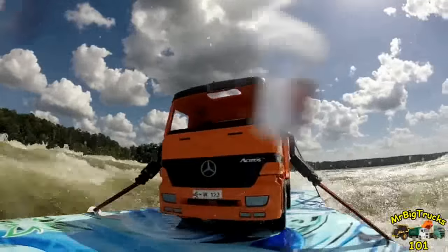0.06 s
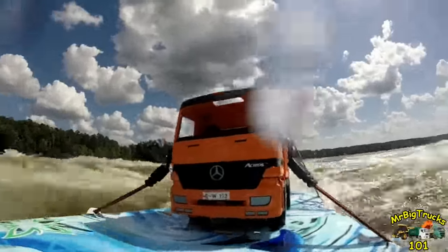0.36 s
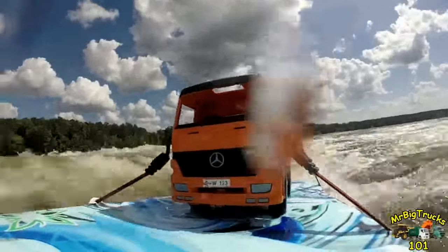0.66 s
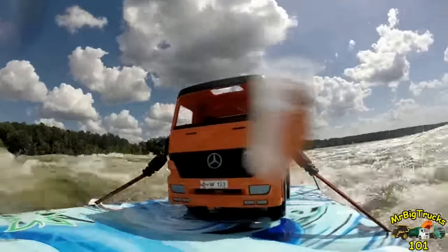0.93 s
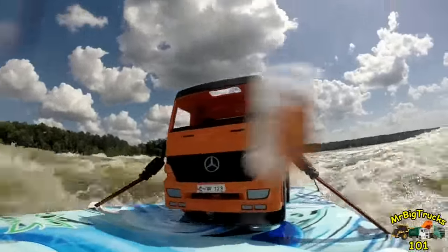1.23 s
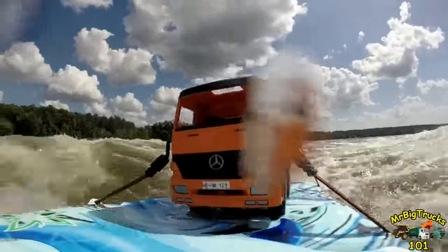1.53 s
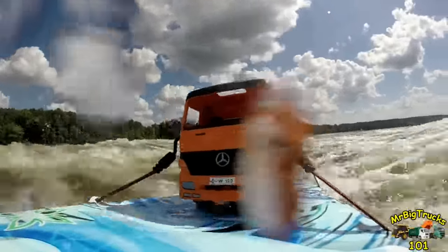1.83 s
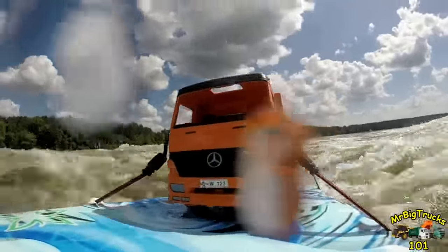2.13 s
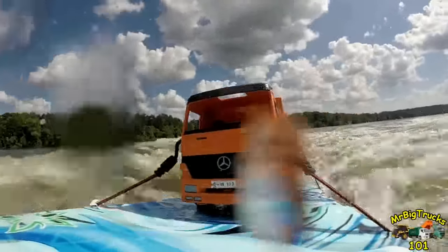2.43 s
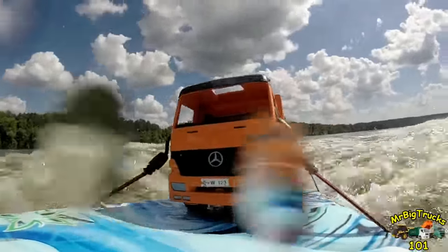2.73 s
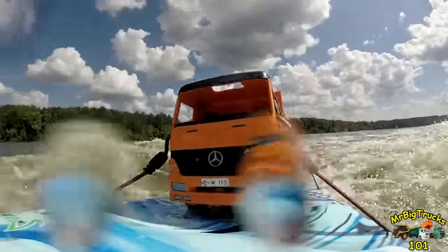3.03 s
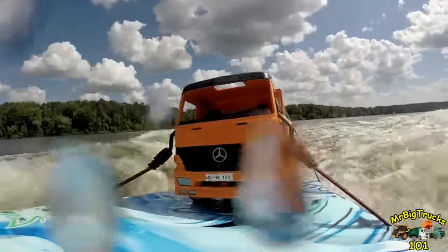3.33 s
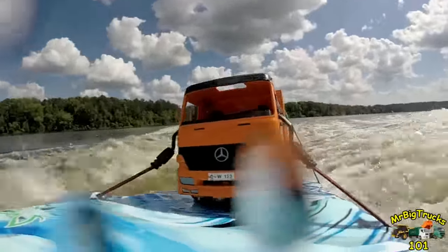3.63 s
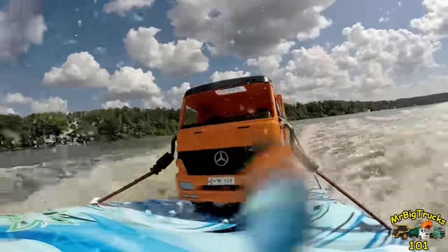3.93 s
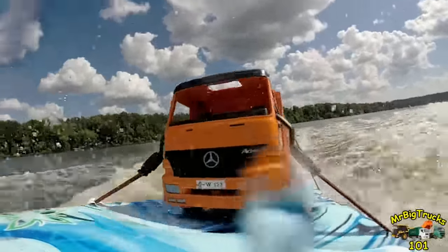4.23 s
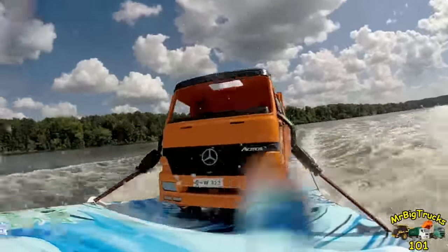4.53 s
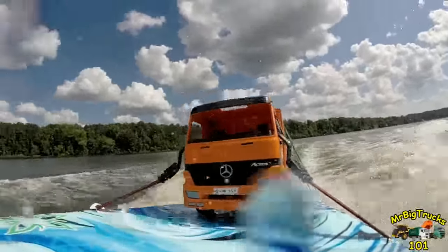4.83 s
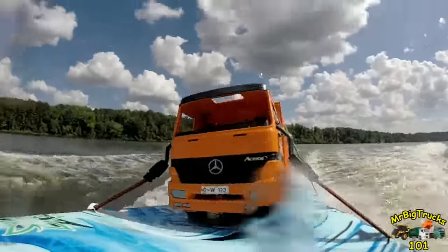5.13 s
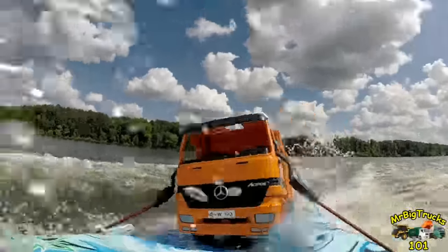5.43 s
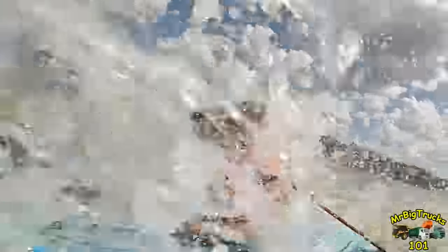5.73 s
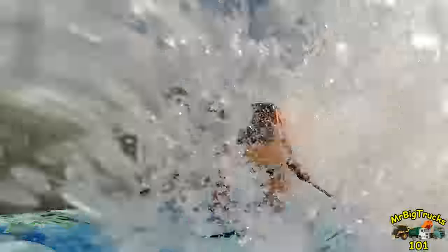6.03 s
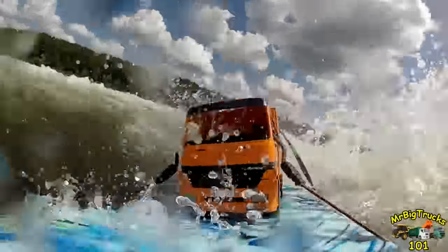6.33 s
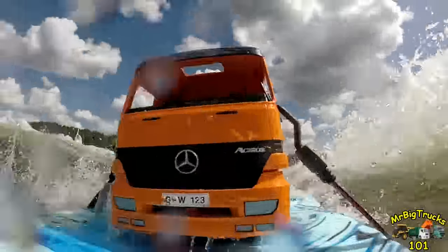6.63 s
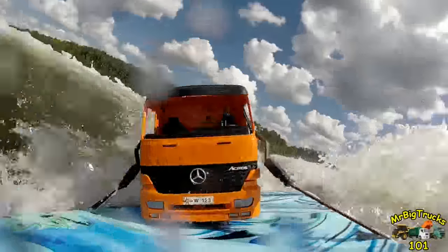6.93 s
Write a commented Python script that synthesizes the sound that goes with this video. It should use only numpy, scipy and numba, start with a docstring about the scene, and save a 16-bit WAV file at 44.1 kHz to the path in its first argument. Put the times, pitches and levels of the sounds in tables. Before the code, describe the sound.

Gusty wind rumbles and flutters throughout on a microphone inside a waterproof case, on a float towed through a boat's wake. Churning water rushes along with it, muffled and hollow, surging at each crest, while the float lands on the chop with dull, low thumps. From the start to 5 seconds, short splashes and sharp slaps hit the case irregularly, strongest near 0.1, 1.2, 1.9, 3.4, 3.7 and 4.0 to 5.0 seconds, mixed with small plops and ticking droplets. From about 5.2 to 5.6 seconds a wave drenches the case: loud, close, crackling sheets of water, rapid slaps and gurgling bubbles that drain into fizz. After a brief dip, another slap and wash arrive around 5.8 seconds. From 6 seconds fine spray sizzles thinly over hollower rushing water and renewed gusts, with final thumps, plops and slaps near 6.8 seconds.

```python
"""In a boat's wake, on a towed float that carries a camera in a waterproof case.
Wind buffets the case and the float thumps on the chop; each crest churns up water and spray,
heard through the case's hollow resonances. Splashes, slaps and fine spatter hit it, air pockets
plop beside it, and a little after five seconds a wave drenches it in sheets."""
import sys
import numpy as np
from scipy import signal
from scipy.fft import rfft, irfft, next_fast_len
from scipy.io import wavfile
from scipy.ndimage import uniform_filter1d
from numba import njit

SR = 44100
rng = np.random.default_rng(int(sys.argv[2]) if len(sys.argv) > 2 else 0)


def wav_record(signal):
    """Record a signal, one row per channel, as 16-bit PCM in the file named by sys.argv[1]."""
    frames = np.transpose(np.atleast_2d(signal))
    bounded = np.clip(frames, -1, 1)
    # unit amplitude maps onto the largest positive 16-bit level
    quanta = np.round(bounded * 32767).astype(np.int16)
    wavfile.write(sys.argv[1], SR, quanta)


N = 307818
TIME = np.arange(N) / SR


def undb(db):
    """Decibels to gain."""
    return 10 ** (np.asarray(db) / 20)


def unit(x):
    """Scale to rms 1."""
    return x / np.sqrt(np.mean(x ** 2))


def curves(table):
    """One automation curve for each column after the time."""
    times, *columns = np.transpose(table)
    return [np.interp(TIME, times, column) for column in columns]


def add(out, start, x):
    """Mix x into out from start seconds on."""
    i = int(start * SR)
    out[i:i + len(x)] += x[:N - i]


def colour(x, points):
    """Minimum-phase EQ drawn through (frequency [Hz], gain [dB]) points."""
    size = next_fast_len(len(x) // 2 + 2 ** 10) * 2
    hz, db = np.transpose(points)
    freq = np.maximum(np.fft.rfftfreq(size, 1 / SR), 1)
    gain = undb(np.interp(np.log(freq), np.log(hz), db))
    cepstrum = irfft(np.log(gain))
    cepstrum[1:size // 2] *= 2
    cepstrum[size // 2 + 1:] = 0
    return irfft(rfft(x, size) * np.exp(rfft(cepstrum)))[:len(x)]


def band(x, low_hz, high_hz):
    """Steep band-pass."""
    return signal.sosfilt(signal.butter(4, [low_hz, high_hz], btype="band", fs=SR, output="sos"), x)


@njit
def resonate(x, hz, width):
    """Band-pass with a moving centre, gain 1 there."""
    out, band_state, low_state = np.empty(len(x)), 0., 0.
    for i in range(len(x)):
        tuning, damping = np.tan(np.pi * hz[i] / SR), width / hz[i]
        passed = (band_state + tuning * (x[i] + 1e-18 - low_state)) / (1 + tuning * (tuning + damping))
        band_state = 2 * passed - band_state
        low_state += 2 * tuning * passed
        out[i] = damping * passed
    return out


def wander(rate):
    """Smooth random modulation with rate new values a second; rms 1."""
    hold = int(SR / rate)
    steps = np.repeat(rng.standard_normal(N // hold + 1), hold)
    return unit(uniform_filter1d(uniform_filter1d(steps, hold), hold)[:N])


def steady(x, span):
    """Even out swells slower than span seconds; rms near 1."""
    window = int(span * SR)
    power = uniform_filter1d(uniform_filter1d(x ** 2, window), window)
    return x / np.sqrt(power + 1e-12)


def swells(times, halves, levels_db):
    """Summed power of rounded swells that peak at the given times."""
    shape, fall_ratio = 1.94, 0.91  # 1 = pointed, 2 = bell; fall time over rise time
    power = np.zeros(N)
    for when, half, db in zip(times, halves, levels_db):
        near = slice(*np.searchsorted(TIME, [when - 6 * half, when + 6 * half]))
        away = (TIME[near] - when) / half
        power[near] += undb(db) ** 2 * np.exp(-np.maximum(-away, away / fall_ratio) ** shape)
    return power


def burst(source, start, length, rise, fall):
    """A stretch of source that swells fast, sags while the water lands and dies away; times in s."""
    i = int(start * SR)
    piece = np.take(source, np.arange(i, i + 2 ** 13), mode="wrap")
    t = np.arange(len(piece)) / SR
    attack = 1 - np.exp(-t / rise)
    decay = np.exp(-.6 * t / length - np.maximum(t - length, 0) / fall)
    return piece * attack * decay


def sized(x, length, db):
    """Give a burst the energy of length seconds at db."""
    return x * undb(db) * np.sqrt(length * SR / np.sum(x ** 2))


def patter(rate, spread_db):
    """Drop impacts at random moments, mostly small and a few large; rms 1."""
    sizes = undb(spread_db * np.minimum(rng.exponential(size=N), 5))
    lands = rng.random(N) < rate / SR
    return unit(lands * sizes * rng.standard_normal(N))


def pings(strikes, hz, cycles):
    """Each strike starts a sine that dies away over a few cycles."""
    pole = np.exp((2j * np.pi - 1 / cycles) * hz / SR)
    return signal.lfilter([0, pole.imag], [1, -2 * pole.real, abs(pole) ** 2], strikes + 1e-18)


def bubbles(rate, spread_db, cycles, size=N):
    """Bubbles of all sizes burst at random moments, each ringing briefly; flat spectrum, rms 1."""
    out = np.zeros(size)
    pitches = np.geomspace(300, 10800, 44)
    for hz in pitches:
        when, chance, sign = rng.random((int(rate * size / SR / len(pitches)), 3)).T
        strength = undb(spread_db * np.minimum(-np.log1p(-chance), 3.5))
        strikes = np.bincount((when * size).astype(int), np.sign(sign - .5) * strength, size)
        out += hz * pings(strikes, hz, cycles)
    return unit(out)


# the muffling of the case wall: (frequency [Hz], gain [dB])
CASE_EQ = [(150, 6.5), (400, -6), (590, 2), (740, 0), (900, 0), (1120, -7), (1350, -24), (1750, -16),
           (2500, -29), (3300, -37), (4400, -32), (6300, -43), (7200, -52.5), (9500, -50.5)]


def through_case(x):
    """The case lets the lows through and dulls the top."""
    return colour(x, CASE_EQ)


# sharp resonances of the case: (frequency [Hz], width [Hz], boost [dB])
CASE_RESONANCES = [(538, 98, 3.5), (888, 75, 2), (1240, 170, 4.5), (2542, 340, 7.5), (4360, 250, 6),
                   (6190, 150, 6.5), (8020, 400, 14), (8830, 340, 14)]


def case_ring(x, drift):
    """The case rings; water running over it detunes the resonances, 1.3 % per unit of drift."""
    tuning = np.ones(len(x)) + 0.013 * drift
    out = x
    for hz, width, db in CASE_RESONANCES:
        out = out + (undb(db) - 1) * resonate(x, hz * tuning, float(width))
    return out


# the bed of moving water and air: (time [s], rush [dB], buffet [dB], mist [dB])
FLOW = [(0, -30, -26, -63), (.13, -63, -37, -53), (.19, -42, -31, -64.5), (.6, -34.5, -23, -60.5),
        (1.46, -36, -27, -58.5), (2.06, -35.5, -25, -56), (2.64, -31, -23.5, -51), (2.93, -40, -28, -57.5),
        (3.62, -38.5, -27, -57.5), (4.42, -39.5, -27, -57.5), (4.77, -35.5, -28.5, -60),
        (5.16, -45, -34, -59), (5.22, -23, -18, -54), (5.56, -39, -30, -61), (5.65, -42, -43, -59),
        (5.96, -46.5, -31, -62), (6.05, -35, -23, -54.5), (6.98, -33, -21.5, -52)]


def flow():
    """Power of the rush, buffet and mist streaming past the float, swelling and dipping."""
    return [undb(db) ** 2 for db in curves(FLOW)]


# crests of the wake: (time [s], half length [s], rush [dB], buffet [dB], extra spray [dB])
CRESTS = [(0.048, 0.041, -26, -18.5, 4.5), (0.112, 0.017, -28, -16.5, 3.5), (0.473, 0.063, -33, -34, -1.5),
          (0.832, 0.064, -25.5, -20, 0), (1.189, 0.061, -27, -19, -0.5), (1.296, 0.023, -24, -19, 1),
          (1.57, 0.033, -29.5, -18, -2.5), (1.711, 0.062, -26.5, -18.5, -7.5),
          (1.887, 0.062, -27, -26.5, 1.5), (2.183, 0.042, -33.5, -23, 0), (2.346, 0.023, -30.5, -24.5, 5),
          (2.555, 0.033, -23, -19.5, -0.5), (2.675, 0.029, -27, -22, 0.5), (2.814, 0.025, -22, -23, -0.5),
          (3.084, 0.076, -41, -27, 4), (3.143, 0.026, -25.5, -29, 2), (3.236, 0.044, -34, -23.5, 0),
          (3.392, 0.023, -23.5, -23, -2), (3.501, 0.069, -31.5, -26.5, 2), (3.774, 0.064, -28.5, -19.5, 1),
          (3.842, 0.036, -26, -22.5, 1), (4.087, 0.046, -27.5, -16, 6), (4.185, 0.032, -32.5, -31, 5.5),
          (4.279, 0.035, -23.5, -16.5, 1), (4.403, 0.029, -33.5, -23.5, 2), (4.497, 0.033, -28.5, -17, 5),
          (4.662, 0.019, -31.5, -19, 6.5), (4.84, 0.018, -35, -21, 8.5), (4.931, 0.034, -33.5, -19.5, 8),
          (5.033, 0.042, -36.5, -21.5, 8.5), (5.476, 0.039, -35, -17, 9), (5.607, 0.0055, -32, -9, 0),
          (5.774, 0.068, -32.5, -25.5, -2), (5.859, 0.043, -35, -21, 3), (6.12, 0.027, -35, -30, -12),
          (6.19, 0.057, -25, -20, -2), (6.509, 0.048, -22.5, -29, -5.5), (6.78, 0.045, -25.5, -15, -4),
          (6.827, 0.016, -20, -14, -6), (6.948, 0.03, -33.5, -29, 9)]


def crests():
    """Power of rush, buffet and spray, swelling as the float runs over each crest."""
    when, half, rush_db, buffet_db, spray_db = np.transpose(CRESTS)
    return [swells(when, half, db) for db in (rush_db, buffet_db, rush_db + spray_db)]


# headwind on the case: (time [s], rumble level [dB])
HEADWIND = [(0, -14.5), (.2, -23), (.48, -22.5), (.75, -16.5), (.97, -20.5), (1.2, -11), (1.62, -27),
            (2.1, -26.5), (3.0, -18), (3.6, -21.5), (4.3, -16.5), (4.6, -14.5), (5.12, -25), (5.48, -28),
            (5.65, -31), (5.78, -17.5), (5.98, -22), (6.45, -12.5), (6.98, -21)]
# gusts on top of it: (time [s], half length [s], rumble level [dB])
GUSTS = [(0.073, 0.059, -12.5), (0.88, 0.028, -9), (1.342, 0.024, -12), (1.768, 0.044, -8.5),
         (1.978, 0.022, -10), (2.316, 0.19, -11.5), (2.582, 0.044, -11.5), (2.729, 0.014, -7),
         (2.832, 0.017, -12.5), (6.26, 0.045, -14), (6.773, 0.032, -10)]
# sub weight of large, slow eddies: (frequency [Hz], gain [dB])
RUMBLE_EQ = [(8, -46), (18, 3), (27, 6.5), (42, -2), (65, -12), (110, -26), (300, -80.5)]
# low flutter of small, quick eddies: (frequency [Hz], gain [dB])
BUFFET_EQ = [(40, -4.5), (75, 0), (140, -0.5), (200, -6), (280, -11), (420, -20), (900, -65), (3000, -78.5)]


def wind():
    """Eddies press on the case in lumps; small ones come in ragged puffs, torn off the large ones."""
    headwind_db, = curves(HEADWIND)
    rumble_gain = np.sqrt(undb(headwind_db) ** 2 + swells(*np.transpose(GUSTS)))
    _, flow_buffet, _ = flow()
    _, crest_buffet, _ = crests()
    rumble = steady(colour(rng.standard_normal(N), RUMBLE_EQ), span=0.14)
    rumble = np.interp(TIME - 0.0012 * rumble, TIME, rumble)  # strong eddies lean into steep fronts
    shedding = np.sqrt(1 + rumble ** 2)
    puffs = rng.standard_normal(N) * shedding * undb(2.6 * wander(70))
    buffet = steady(colour(puffs, BUFFET_EQ), span=0.07)
    return rumble * rumble_gain + buffet * np.sqrt(flow_buffet + crest_buffet)


# bite of the rush, which turns hollow once the case is soaked: (time [s], gain at 1150 Hz [dB])
RUSH_EDGE = [(0, 1.5), (1.2, 6), (3.2, 9), (5, 3), (6.1, -8.5), (6.6, -5.5), (6.95, 11)]


def wake():
    """Countless bursting bubbles ring the case; froth, mist and droplets flicker above them."""
    churn = 1.52 * rng.standard_normal(N) + bubbles(rate=2800, spread_db=4, cycles=0.77)
    churn *= undb(2.0 * wander(55))
    inside = case_ring(through_case(churn), drift=wander(6))
    edge_db, = curves(RUSH_EDGE)
    edge = (undb(edge_db) - 1) * signal.lfilter(*signal.iirpeak(1150, 2.5, fs=SR), inside)
    rush = steady(band(inside + edge, 308, 1870) * undb(2.6 * wander(90)), span=0.052)
    froth = steady(band(inside, 1452, 3000) * undb(2.2 * wander(57)), span=0.068)
    coarse_mist = band(inside, 2970, 5660) * undb(2.1 * wander(35))
    fine_mist = band(inside, 5500, 9440) * undb(4.7 * wander(35))
    mist = steady((coarse_mist + fine_mist) * undb(1.7 * wander(56)), span=0.091)
    droplets = unit(band(through_case(patter(rate=100, spread_db=2.0)), 1900, 9000))
    # each crest lifts rush, froth and mist above the bed
    flow_rush, _, flow_mist = flow()
    crest_rush, _, spray = crests()
    flow_froth = undb(-22.5) ** 2 * flow_rush + undb(5) ** 2 * flow_mist
    rush_gain = np.sqrt(flow_rush + crest_rush)
    froth_gain = np.sqrt(flow_froth + undb(-13.5) ** 2 * spray)
    mist_gain = np.sqrt(flow_mist + undb(-28) ** 2 * spray)
    return rush * rush_gain + froth * froth_gain + (mist + undb(-14) * droplets) * mist_gain


# fine rain on the wet microphone port after the wave: (time [s], level [dB])
DRIZZLE = [(5.6, -75), (5.66, -62), (5.82, -63), (5.92, -66), (6.02, -52.5), (6.3, -58.5), (6.49, -48),
           (6.64, -53), (6.84, -60), (6.93, -75), (6.98, -61)]
# its thin, bright tone: (frequency [Hz], gain [dB])
DRIZZLE_EQ = [(1500, -15.5), (2800, -4), (4700, 3.5), (6500, -4), (9800, -6.5)]


def drizzle():
    """Spray thrown up by the wave comes down as a patchy sizzle of droplets."""
    level_db, = curves(DRIZZLE)
    sizzle = unit(colour(patter(rate=1500, spread_db=0), DRIZZLE_EQ))
    return sizzle * undb(level_db + 2.2 * wander(45))


# handfuls of droplets flicked onto the case: (time [s], length [s], level [dB])
SPATTERS = [(.04, .018, -47), (.084, .01, -44), (0.102, .008, -51), (0.45, .01, -50), (0.829, 0.016, -41.5),
            (0.914, .016, -47), (1.308, 0.018, -43.5), (1.592, 0.031, -50), (1.968, 0.014, -49),
            (2.042, 0.013, -44.5), (2.068, 0.0087, -53.5), (2.212, .01, -44), (2.257, 0.02, -48),
            (2.817, .012, -44), (2.96, .008, -48), (2.983, .008, -43.5), (3.456, .014, -41.5),
            (3.487, 0.0048, -47), (3.52, 0.0068, -56), (3.554, .008, -47), (3.73, 0.0098, -46),
            (3.978, .008, -52), (4.06, 0.025, -39), (4.181, 0.015, -41), (4.247, 0.0086, -50),
            (4.518, 0.0097, -42), (4.552, .008, -55), (4.582, .008, -51)]
# their ticking tone: (frequency [Hz], gain [dB])
SPATTER_EQ = [(700, -19), (2700, 5.5), (3400, -4.5), (4600, 3.5), (5400, -7), (6300, -2.5), (7200, -19),
              (8500, -9.5), (9800, -18.5)]


def spatters():
    """Fine droplets land in short ticking clusters, each tinted a little differently."""
    out = np.zeros(N)
    drops = steady(bubbles(rate=2600, spread_db=2.5, cycles=9.2, size=2 * SR), span=0.012)
    shifts = np.exp(0.032 * rng.standard_normal(len(SPATTERS)))
    for (start, length, db), shift in zip(SPATTERS, shifts):
        tint = [(hz * shift, gain_db) for hz, gain_db in SPATTER_EQ]
        cluster = burst(drops, start, length, rise=0.00084, fall=.003)
        add(out, start, sized(colour(cluster, tint), length, db))
    return out


# air pockets closing beside the case: (time [s], peak [dB], starting pitch [Hz], decay [cycles])
PLOPS = [(0.4428, -11, 836, 1.7), (.7862, -7.5, 836, 2.6), (1.1917, -12, 930, 3), (1.523, -15, 880, 3.3),
         (1.9597, -10, 960, 2.5), (2.2375, -14, 810, 1.6), (2.6301, -13, 980, 3), (3.7233, -10, 880, 1.9),
         (4.032, -15.5, 900, 2.5), (4.5393, -10.5, 980, 1.9), (4.7014, -19, 1125, 2),
         (6.826, -15, 900, 2.2), (6.839, -10.5, 942, 5)]


def plops():
    """A closing air pocket swells within a cycle, then rings briefly, rising in pitch as it surfaces."""
    out = np.zeros(N)
    t = np.arange(2 ** 11) / SR
    rise_cycles, glide = 0.31, 5.6
    for start, db, hz, decay_cycles in PLOPS:
        turns = hz * t * (1 + glide * t)
        envelope = (1 - np.exp(-turns / rise_cycles)) * np.exp(-turns / decay_cycles)
        tone = -np.sin(2 * np.pi * turns) * envelope
        add(out, start, undb(db) * tone / np.max(np.abs(tone)))
    return out


# low hits of the float smacking down on the chop: (time [s], peak [dB], pitch [Hz])
THUMPS = [(.122, -4.5, 71), (0.836, -4.5, 70), (1.188, -6, 85.5), (1.697, -14, 95), (1.729, -17, 69),
          (1.856, -4.5, 100), (1.957, -10.5, 65), (1.976, -12, 101), (2.192, -9, 110), (2.372, -7.5, 101),
          (2.586, -4.5, 99), (2.703, -7, 90), (2.829, -6.5, 69), (3.39, -9.5, 111), (3.738, -13, 101),
          (4.179, -5, 65), (4.302, -6.5, 75), (4.411, -5, 85), (4.88, -6, 85), (4.915, -4.5, 125),
          (5.222, -7, 200), (5.328, -10, 160), (5.349, -8, 171), (5.425, -10, 120), (5.473, -13, 150),
          (5.532, -8.5, 140), (6.772, -7, 110), (6.798, -8.5, 121)]


def thumps():
    """Each landing shoves the case once; it swings back and settles."""
    out = np.zeros(N)
    t = np.arange(2 ** 12) / SR
    decay_cycles = 0.39
    for start, db, hz in THUMPS:
        swing = np.sin(2 * np.pi * hz * t) * np.exp(-t * hz / decay_cycles)
        add(out, start, undb(db) * swing / np.max(swing))
    return out


# water thrown at the case: (time [s], length [s], level [dB], extra spatter [dB], extra fizz [dB])
SPLASHES = [(0.032, 0.034, -20.5, 16, 17), (0.102, 0.034, -20, -10, -18), (0.486, 0.03, -32, 17, 17),
            (0.825, 0.046, -23.5, -8, 4), (0.857, 0.013, -33.5, 17, 26.5), (1.167, 0.042, -23.5, 10.5, 9),
            (1.208, 0.016, -21.5, 14.5, 14.5), (1.267, 0.038, -31, 12, -3), (1.554, .013, -38, 15, 23),
            (1.839, 0.014, -17.5, 15, 15.5), (1.853, 0.033, -19, 2, 5), (1.878, 0.047, -36.5, 12, 25.5),
            (2.183, 0.01, -27.5, 5, 15), (2.285, 0.012, -36, 14, 20), (2.504, 0.027, -22, 11, -17),
            (2.523, 0.0036, -25.5, -3, 44), (2.553, 0.034, -18, 2, -4), (2.586, 0.0072, -24, 5, 13),
            (2.808, 0.02, -20.5, -5, -3), (2.852, 0.003, -15, 4, 8), (3.037, 0.062, -27.5, 15.5, 10),
            (3.36, 0.0046, -20, -1, 6), (3.391, 0.0087, -13, 11, 11), (3.451, 0.042, -29, 11, 4),
            (3.731, 0.02, -15.5, 6.5, 7.5), (4.046, 0.04, -19, 13.5, 9), (4.1, 0.012, -23.5, 0, 12),
            (4.177, .016, -34.5, 12, 5), (4.405, 0.013, -28, 12, 12), (4.516, 0.0075, -19.5, 13.5, 1),
            (4.648, 0.016, -15.5, 7.5, 5.5), (4.701, 0.0025, -15.5, 15, 4), (4.814, 0.015, -34.5, 17, 20),
            (4.905, 0.012, -14.5, 12, 12), (4.921, 0.035, -38, 12, 9), (4.962, 0.0016, -16, -12, -16),
            (5.036, 0.016, -27.5, 26, 19), (5.082, 0.014, -35.5, 22, 24), (5.116, 0.005, -18.5, 6, 5.5),
            (6.74, 0.052, -34, -11, 10), (6.845, 0.0052, -19, 3, -4), (6.875, 0.026, -31.5, 18, 17),
            (6.908, 0.033, -20.5, 6, 3.5)]


def splashes():
    """Each splash is a dense volley of drops and bubbles that rings the case, with its own brightness."""
    out = np.zeros(N)
    bubbling = bubbles(rate=7000, spread_db=1.5, cycles=1.44, size=2 * SR)
    drops = steady(bubbling + 0.46 * rng.standard_normal(2 * SR), span=0.013)
    for start, length, db, spatter_db, fizz_db in SPLASHES:
        volley = burst(drops, start, length, rise=.0012, fall=.003)
        inside = case_ring(through_case(volley), drift=rng.standard_normal())
        spatter_eq = [(950, 0), (1500, spatter_db), (2800, spatter_db)]
        # fine spray sizzles most near 6 kHz
        fizz_eq = [(4500, fizz_db - 6), (5600, fizz_db), (6300, fizz_db + 10.5),
                   (7300, fizz_db - 5), (9500, fizz_db - 6.5)]
        add(out, start, sized(colour(inside, spatter_eq + fizz_eq), length, db - .3))
    return out


# lumps of water trapping air on the case: (time [s], level [dB], pitch [Hz], crack brightness [dB])
SLAPS = [(0.136, -5.5, 1150, 0), (0.142, -1.5, 1050, -8), (0.1409, -3, 2400, -27), (.149, -9.5, 2880, -18),
         (0.153, -18, 2700, -4), (1.19, -2.5, 805, -8), (1.2096, -10.5, 1580, -12), (1.742, -30, 4500, -5),
         (1.8428, -4.5, 1020, -5), (1.867, -10.5, 654, -6), (1.875, -4.5, 830, -3), (1.8793, -12, 850, -11),
         (2.594, -21.5, 4800, -3), (2.8546, -14, 2520, -8), (2.8553, -7, 1370, 9.5),
         (3.246, -25.5, 3470, -9), (3.3603, -12, 1190, 1), (3.4038, -0.5, 1210, 1), (3.404, -6.5, 3600, -7),
         (3.7378, -12, 1840, -18), (3.7385, -3.5, 1030, -3.5), (4.0579, -8.5, 1400, -6),
         (4.073, -5.5, 1500, -17), (4.082, -11, 1200, -5), (4.1088, -9.5, 796, -10), (4.157, -28, 2970, -3),
         (4.222, -26, 2630, -1), (4.305, -24, 3200, -7), (4.307, -11, 1060, -16), (4.322, -19, 2600, -1),
         (4.326, -19, 2580, -2), (4.662, -4.5, 675, -15), (4.7021, -5.5, 2160, -11),
         (4.7035, -6.5, 1190, -0.5), (4.853, -13.5, 1360, -6), (4.9085, -12.5, 1280, -3),
         (4.9164, -3, 610, -7), (4.933, -8, 795, -3), (4.963, -4, 710, -6.5), (5.033, -4.5, 310, -5),
         (5.039, -8.5, 594, 7), (5.0528, -14, 452, 6), (5.184, -15, 900, -8), (5.193, -11.5, 3600, -13),
         (5.204, -10.5, 2600, -9), (5.209, -10, 2000, -8), (5.227, -8, 4500, -7), (5.2283, -11, 620, 2),
         (5.2595, -17, 4300, 1), (5.267, -21, 4300, -4), (5.2695, -19, 350, -2), (5.279, -17, 1000, 7),
         (5.294, -14, 3200, 1), (5.312, -15, 3500, -3), (5.321, -8, 2700, -8), (5.3608, -8, 3400, -4),
         (5.367, -4, 2600, -7), (5.438, -2.5, 2210, 3), (5.45, -16, 2600, 0), (5.4685, -14, 4500, 8),
         (5.5, -15, 2100, 0), (5.533, -17, 298, 2), (5.558, -19, 2500, -9), (5.566, -16, 2500, -6),
         (5.589, -20, 2800, -3), (5.612, -22, 2400, -2), (5.219, -4, 2960, 4.5), (5.2394, -3, 3540, 5),
         (5.247, -4, 3680, -2), (5.327, -5, 396, 1), (5.3304, -11, 320, 2), (5.341, -7, 524, 5),
         (5.35, -18, 280, -2), (5.3615, -4, 400, 5), (5.403, -2.5, 2640, 0), (5.428, -6, 500, 8),
         (5.434, -8, 1900, 6), (5.468, -10, 330, 7), (5.473, -8, 450, 0), (5.482, -7, 493, 20),
         (5.507, 1, 177, -6), (5.574, -8, 393, -4), (5.591, -6, 238, 5), (5.602, -11, 266, 11),
         (5.706, -22.5, 3280, -26), (5.7768, -5, 1030, 2), (5.7775, -7, 2770, -6), (5.833, -17, 1300, 0),
         (5.839, -18, 1200, 1), (6.01, -30, 3470, -5), (6.281, -25, 4540, -2), (6.457, -19.5, 1620, -4),
         (6.637, -23.5, 3970, 2), (6.7563, -8, 700, -15), (6.842, -2, 1020, 5.5), (6.8459, -4, 1340, 6.5)]


def slaps():
    """A trapped air pocket rings briefly; a larger one cracks duller and pushes harder on the case."""
    out = np.zeros(N)
    t = np.arange(2 ** 11) / SR
    for start, db, hz, bright_db in SLAPS:
        pocket = np.sin(2 * np.pi * hz * t) * np.exp(-t * hz / 0.91)
        crack_eq = [(0.15 * hz, -6), (0.24 * hz, 0), (2 * hz, 0), (3 * hz, -11),
                    (5 * hz, -19), (8 * hz, -34), (16 * hz, -50)]
        crack = colour(rng.standard_normal(len(t)) * np.exp(-t / 0.0014), crack_eq)
        crack = colour(crack / np.max(np.abs(crack)), [(1800, 0), (4000, bright_db)])
        push = -np.sin(2 * np.pi * 110 * t) * np.exp(-t / 0.0034) / (1 + (hz / 1800) ** 4)
        # a lump that lands without a bright crack is muffled by the case
        muffle_db = min(bright_db, 0) * np.clip(1000 / hz, 0, 1) ** 4
        hit = colour(2.1 * pocket + crack, [(2.5 * hz, 0), (1.5 * hz, muffle_db)])
        add(out, start, undb(db) * (hit / np.max(np.abs(hit)) + 1.12 * push))
    return out


def gurgle():
    """Air pockets pinch off while the case is under the wave, each rising in pitch."""
    out = np.zeros(N)
    t = np.arange(2 ** 11) / SR
    first_s, last_s, count = 5.2, 5.505, 56
    for k, (jitter, pitch, softness) in enumerate(rng.random((count, 3))):
        hz = 240 * 3.6 ** pitch
        bubble = np.sin(2 * np.pi * hz * t * (1 + 6 * t)) * np.exp(-t * hz / 0.92)
        start = first_s + (last_s - first_s) * (k + jitter) / count
        add(out, start, bubble * undb(-8 - 26 * softness))
    return out


# sheets of water right on the microphone port: (time [s], length [s], level [dB])
SHEETS = [(5.045, 0.0056, -28), (5.189, 0.02, -34), (5.207, 0.028, -24), (5.235, 0.0085, -20.5),
          (5.251, 0.083, -37), (5.31, 0.016, -29), (5.33, 0.038, -39), (5.356, 0.028, -26),
          (5.381, 0.041, -35.5), (5.3975, 0.0083, -19.5), (5.425, 0.025, -20.5), (5.462, 0.048, -22.5),
          (5.515, 0.042, -41.5), (5.551, 0.014, -29.5), (5.587, 0.032, -33), (5.62, 0.015, -48),
          (5.827, 0.054, -40)]
# the close, mid-heavy tone of water breaking there: (frequency [Hz], gain [dB])
PORT_EQ = [(200, -16), (900, 11), (1400, 4), (2200, 9), (3200, 2), (6000, -2.5), (7500, -7.5), (10000, -9)]


def drench():
    """Sheets of water crackle on the port; after each one it fizzes as it drains."""
    out, draining = np.zeros(N), np.zeros(N)
    bubbling = bubbles(rate=5500, spread_db=2.3, cycles=2.8, size=SR)
    crackle = steady(bubbling + .5 * patter(rate=3800, spread_db=2.0)[:SR], span=0.012)
    for start, length, db in SHEETS:
        sheet = colour(burst(crackle, start, length, rise=0.0093, fall=0.0039), PORT_EQ)
        add(out, start, sized(sheet, length, db + 0.16))
        add(draining, start, undb(db) * burst(np.ones(N), start, length, rise=0.0041, fall=0.034))
    fizz = unit(colour(bubbles(rate=2200, spread_db=2, cycles=1.0), PORT_EQ))
    return out + fizz * draining * undb(-10)


def scene():
    """Everything reaches one microphone inside the case."""
    ride = wind() + thumps() + wake()
    water = splashes() + slaps() + drench() + gurgle() + drizzle() + plops() + spatters()
    return (ride + water)[None]


def record(dry):
    """The loudest slaps overload the input; a steep low-pass cuts the top."""
    overloaded = np.clip(dry, -.86, .86)
    top_hz = 9980
    return signal.sosfilt(signal.ellip(10, .2, 70, top_hz, fs=SR, output="sos"), overloaded)


dry = scene()
out = record(dry)
wav_record(out)
```